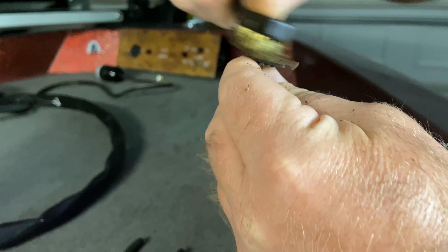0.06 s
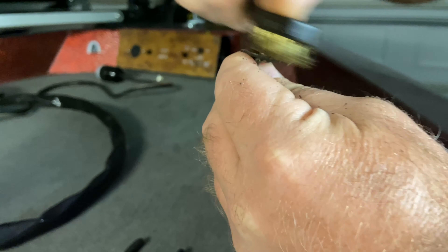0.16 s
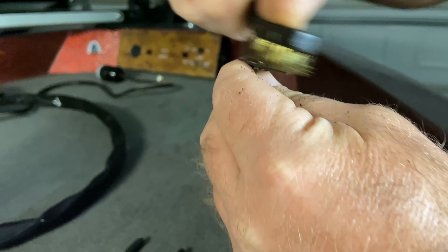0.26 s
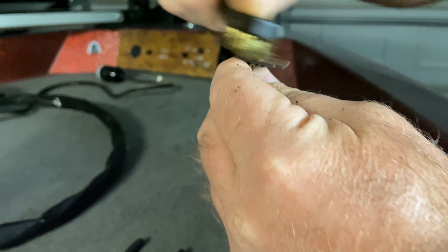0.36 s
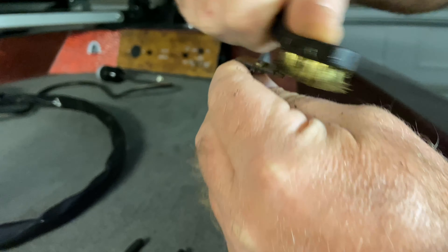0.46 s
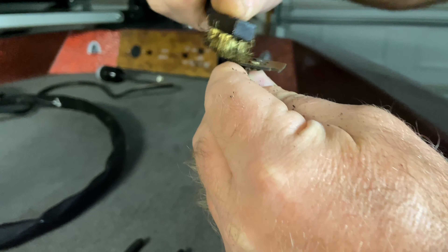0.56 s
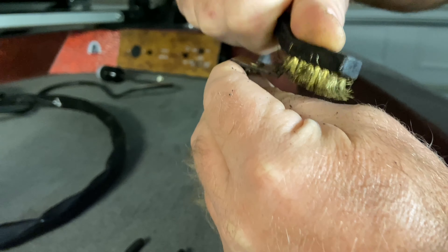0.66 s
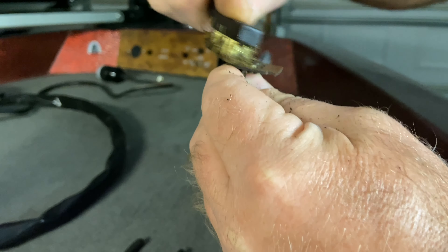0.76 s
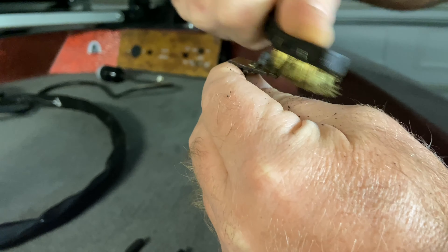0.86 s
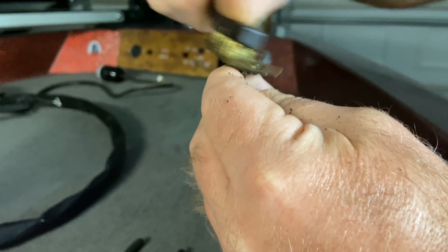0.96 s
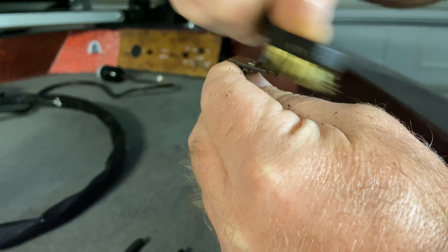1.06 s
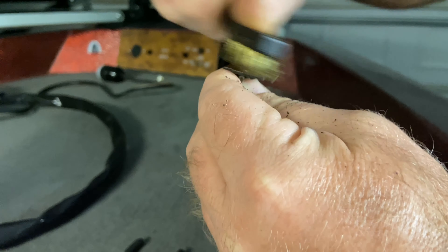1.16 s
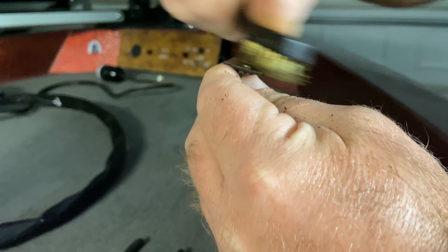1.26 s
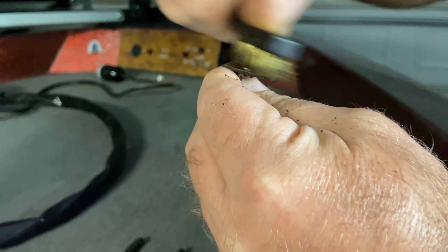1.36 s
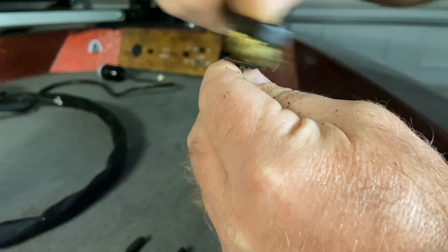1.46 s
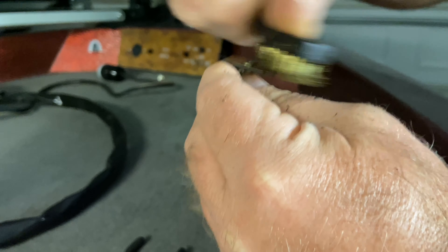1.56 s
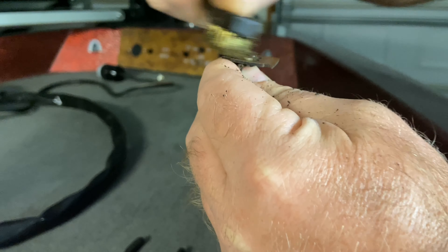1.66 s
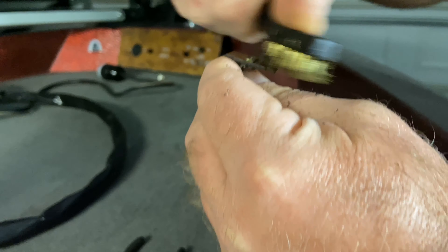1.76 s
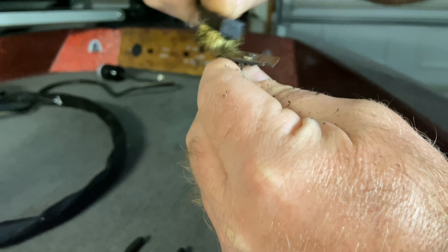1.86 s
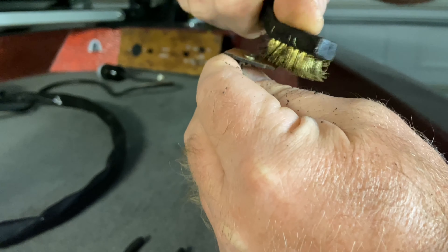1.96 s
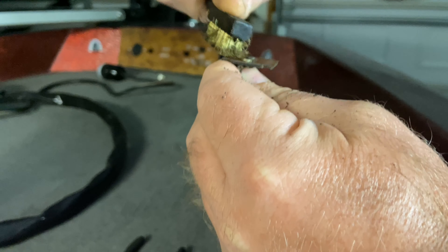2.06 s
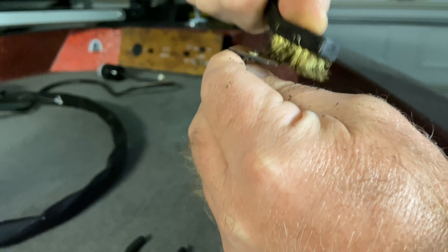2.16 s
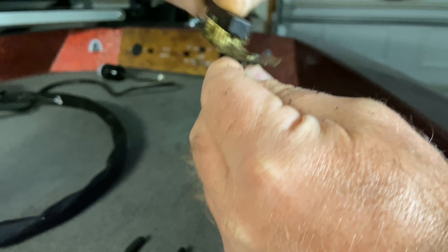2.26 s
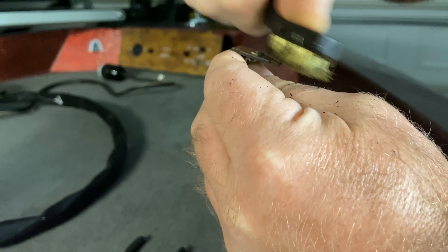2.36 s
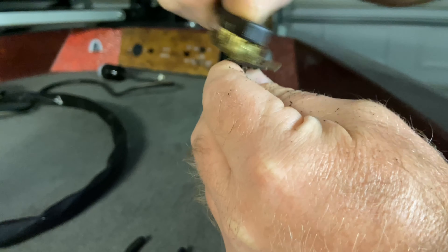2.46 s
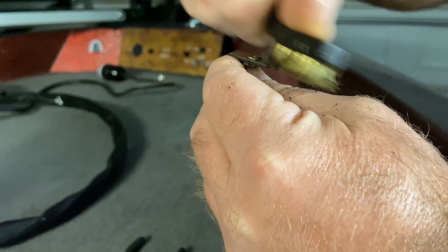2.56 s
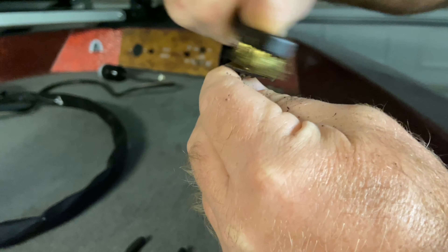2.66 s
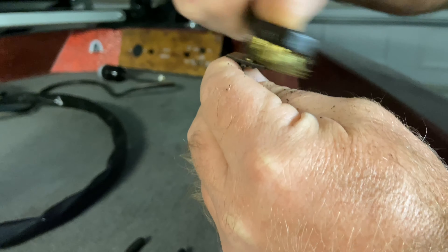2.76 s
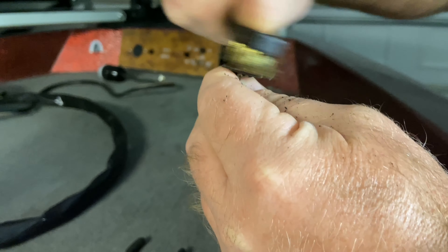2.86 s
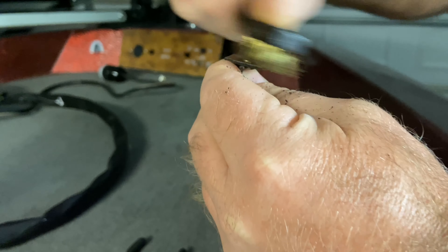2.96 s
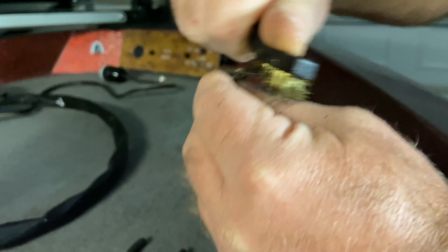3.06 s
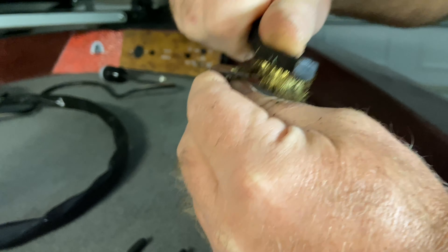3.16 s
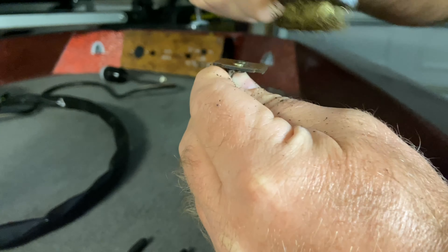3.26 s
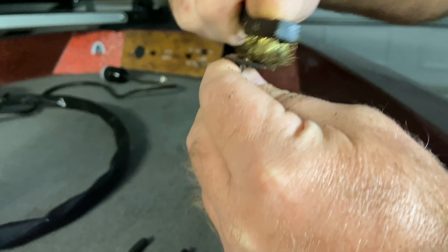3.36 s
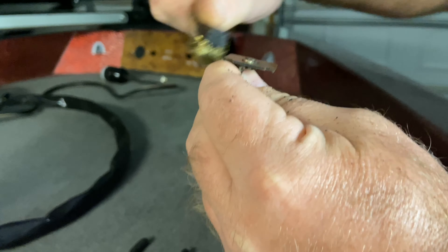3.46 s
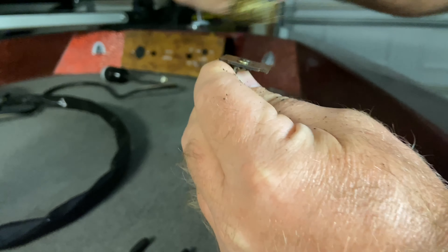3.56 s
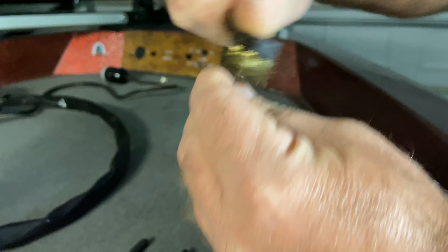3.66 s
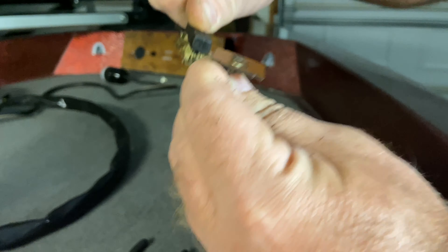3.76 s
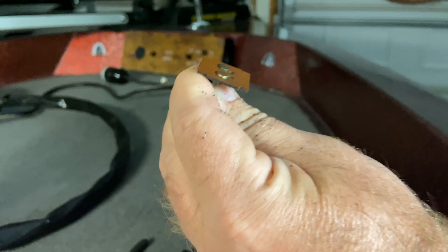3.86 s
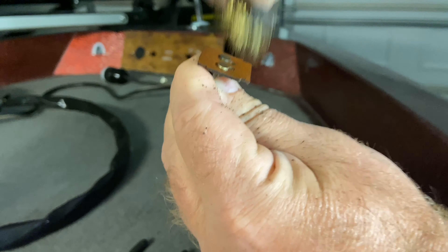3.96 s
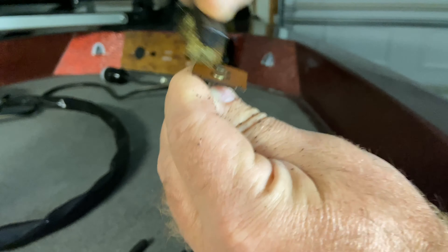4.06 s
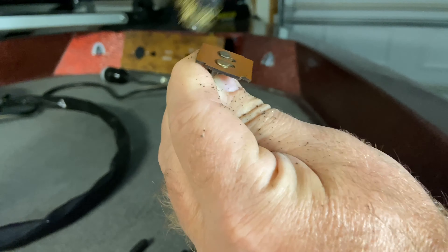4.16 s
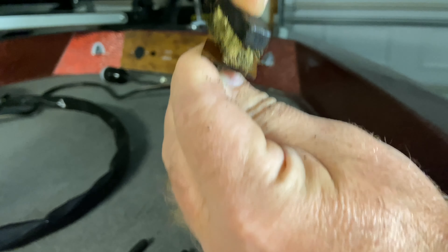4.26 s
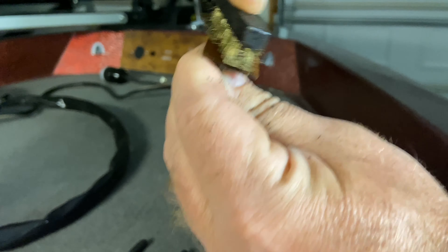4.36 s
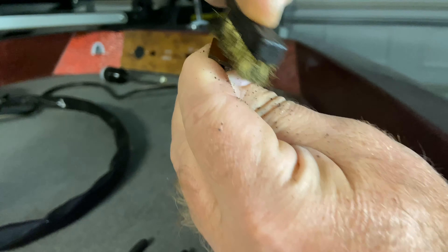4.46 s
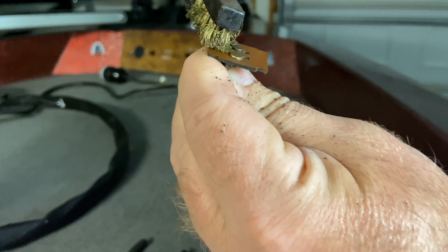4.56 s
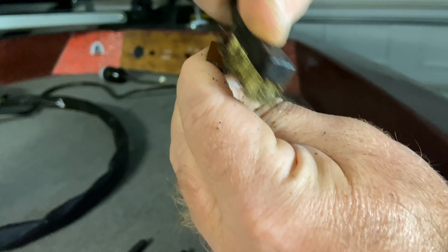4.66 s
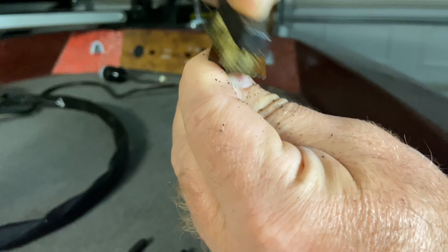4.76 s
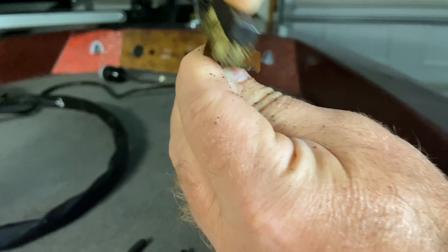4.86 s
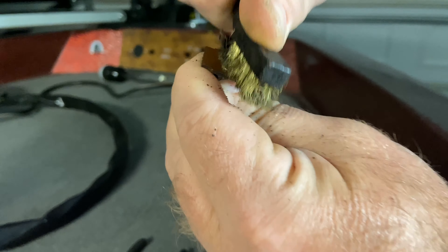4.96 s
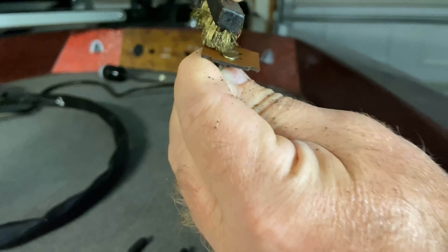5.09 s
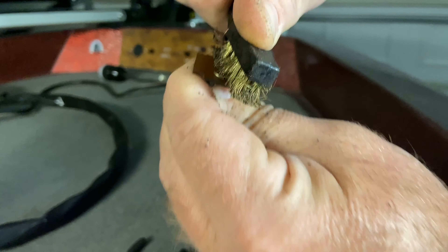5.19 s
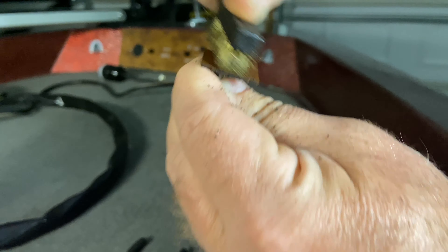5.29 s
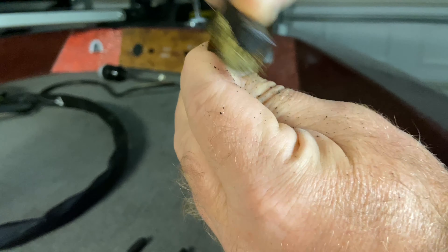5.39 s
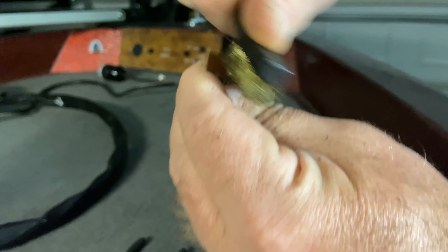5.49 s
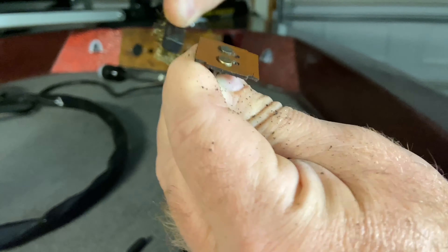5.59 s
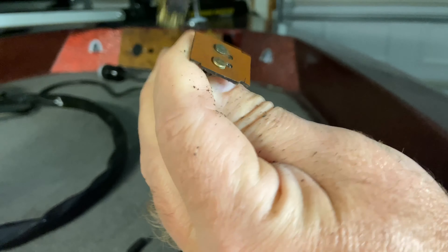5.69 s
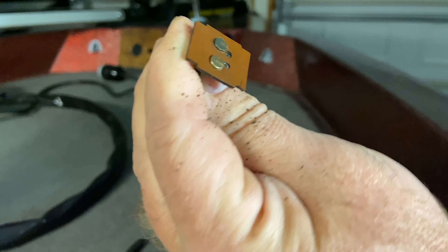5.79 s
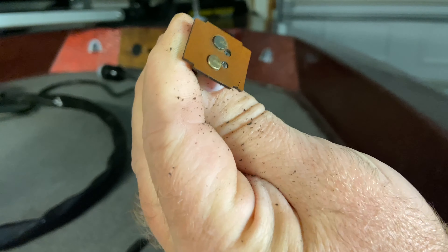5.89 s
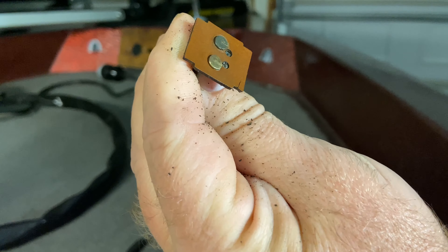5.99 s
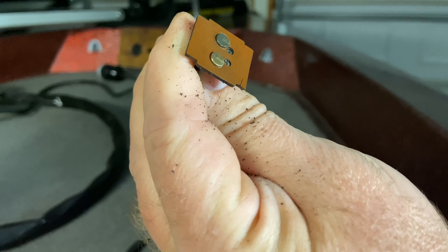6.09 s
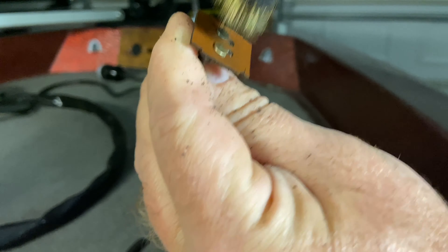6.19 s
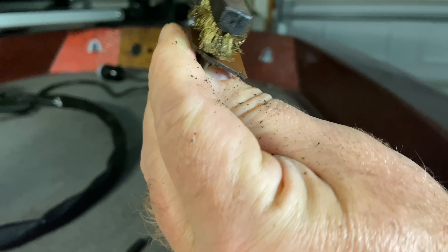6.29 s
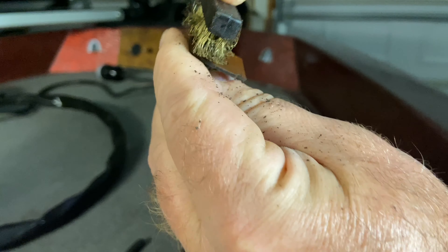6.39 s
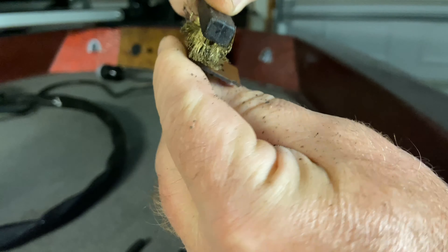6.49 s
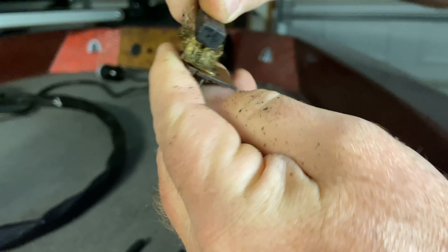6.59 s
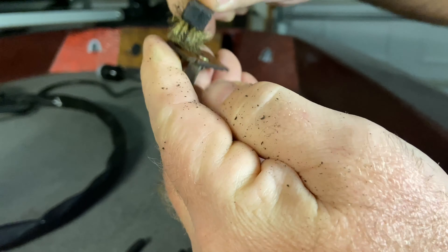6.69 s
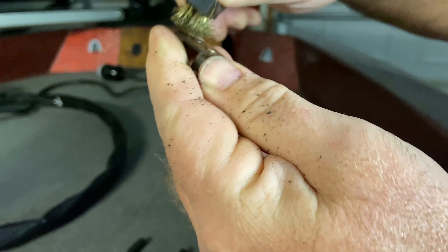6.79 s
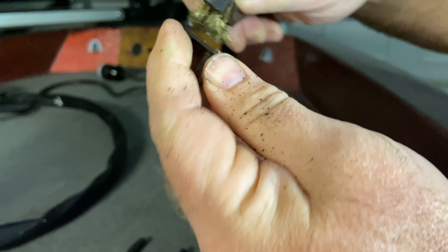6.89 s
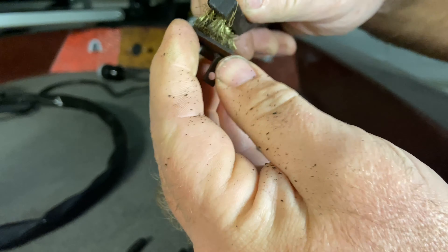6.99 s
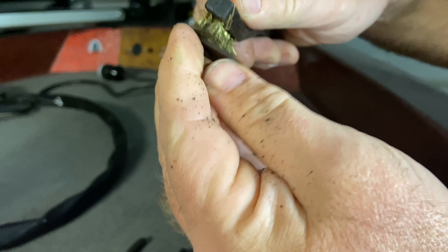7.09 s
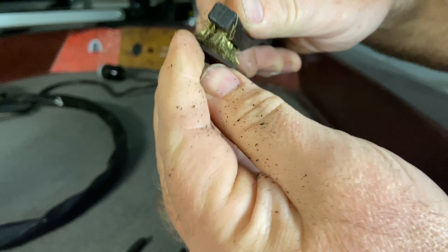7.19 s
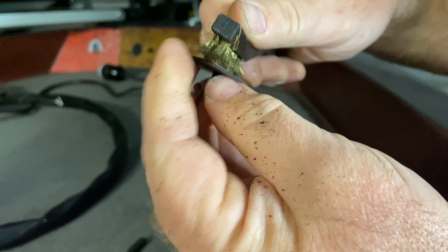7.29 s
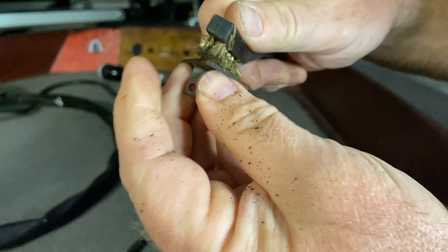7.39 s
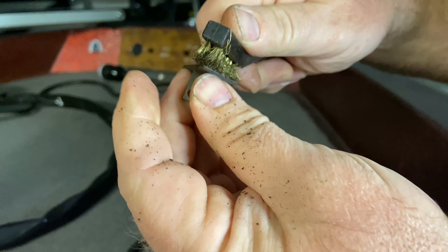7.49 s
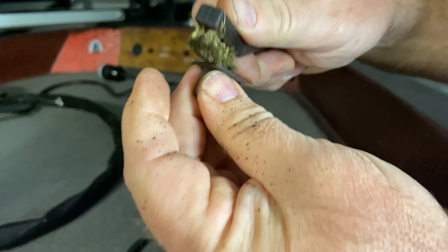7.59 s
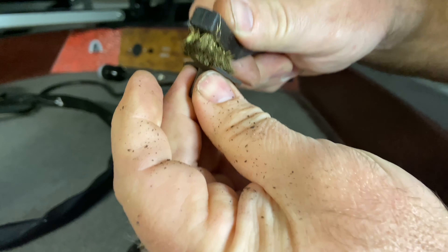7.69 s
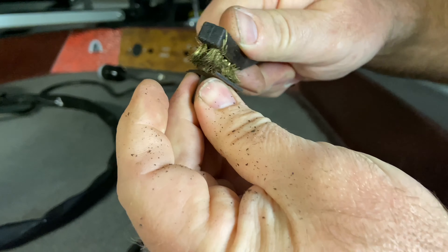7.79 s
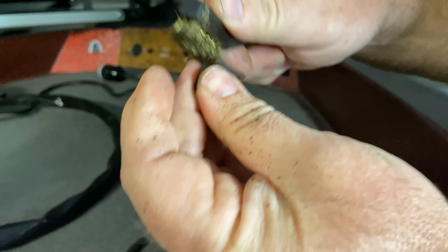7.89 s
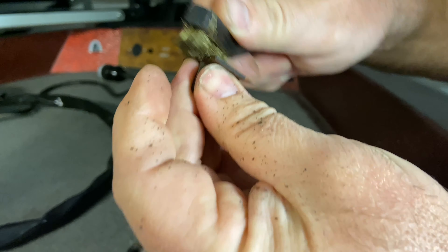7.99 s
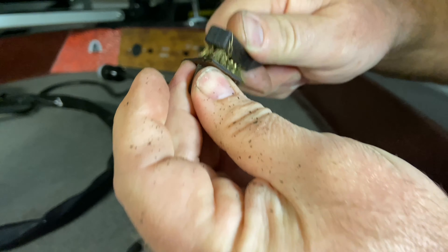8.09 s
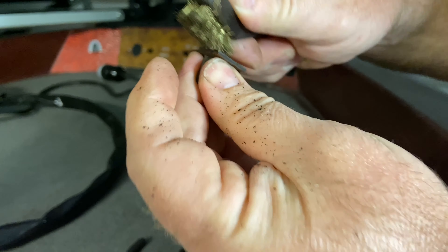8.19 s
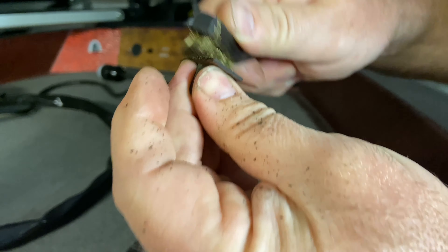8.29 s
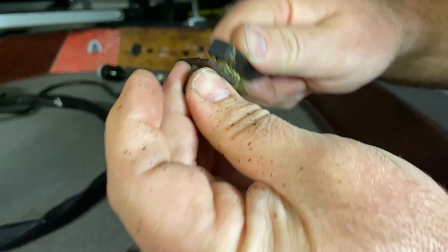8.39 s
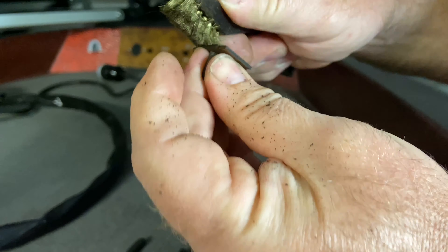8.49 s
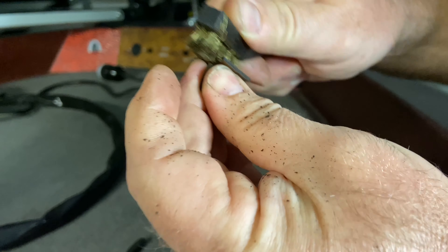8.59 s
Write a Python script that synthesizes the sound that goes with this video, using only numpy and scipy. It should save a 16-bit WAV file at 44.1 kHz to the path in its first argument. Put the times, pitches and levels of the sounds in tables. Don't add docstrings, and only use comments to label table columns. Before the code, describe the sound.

Close up, a small brass-bristled brush scours contacts on a hand-held board with fast, bright, raspy strokes. It breaks into separate flicks and knocks, scrubs again at longer strokes, drops to faint rubs and wire ticks, then finishes with slower edge scrubbing. Low bench shudders and a quiet workshop hush lie beneath.

```python
import sys
import numpy as np
from scipy import signal
from scipy.fft import rfft, irfft
from scipy.io import wavfile
from scipy.ndimage import uniform_filter1d

SR = 44100
rng = np.random.default_rng(int(sys.argv[2]) if len(sys.argv) > 2 else 0)


def field_ratio(decibels):
    return 10 ** (np.asarray(decibels, dtype=float) / 20)


def inscribe(sig):
    pcm = np.round(np.clip(np.atleast_2d(sig).T, -1, 1) * 32767)
    wavfile.write(sys.argv[1], SR, pcm.astype(np.int16))


N = 381288
TIME = np.arange(N) / SR

# (turn time [s], level [dB], dip at the turn [dB])
QUICK_STROKES = [(-.045, -48, -12), (0.076, -46, -15.5), (0.183, -46.5, -18), (0.305, -45, -19),
                 (0.415, -43.5, -12), (0.533, -45.5, -16.5), (.637, -46, -14), (0.752, -45, -15.5),
                 (0.854, -45, -17), (0.963, -43, -20), (1.07, -44.5, -17), (1.182, -44, -21.5),
                 (1.282, -44.5, -24), (1.397, -42.5, -25), (1.498, -44.5, -20), (1.614, -44, -14),
                 (1.719, -44.5, -19.5), (1.828, -42.5, -16), (1.931, -48, -17.5), (2.046, -42, -19),
                 (2.14, -45, -24.5), (2.253, -45, -13), (2.356, -45, -16.5), (2.457, -46, -16),
                 (2.561, -46.5, -9), (2.68, -45.5, -16.5), (2.777, -42.5, -16.5), (2.886, -44.5, -17),
                 (2.981, -50.5, -0.5), (3.057, -49, -15.5)]
# (turn time [s], level [dB], dip at the turn [dB])
LONG_STROKES = [(4.302, -49, -20), (4.408, -48, -17), (4.533, -45, -23.5), (4.656, -47, -14),
                (4.79, -46, -21), (4.926, -43.5, -22), (5.059, -44, -22.5), (5.175, -46.5, -24),
                (5.318, -45, -8), (5.43, -38.5, -23), (5.545, -70, -22.5)]
# (turn time [s], level [dB], dip at the turn [dB])
EDGE_STROKES = [
    (7.485, -51.5, -13),
    (7.615, -53.5, -11),
    (7.73, -64.5, -25),
    (7.817, -49, -15.5),
    (7.913, -45.5, -19.5),
    (8.051, -43, -22),
    (8.178, -45, -14),
    (8.339, -44.5, -13.5),
    (8.479, -50, -8.5),
    (8.627, -68, -19),
]
STROKES = [QUICK_STROKES, LONG_STROKES, EDGE_STROKES]
# (speeding-up share of stroke [0-1], slowing share [0-1], board against bristles [dB],
# mount low modes [dB], mount upper modes [dB])
BOUTS = [
    (0.35, 0.26, -18.5, -63.5, -63),
    (0.34, 0.24, -14, -63.5, -71),
    (0.39, 0.22, -10, -80, -77.5),
]
TRAIL_DB_PER_S = 135
# (frequency [Hz], right port lead [half turns])
PORT_TURN = [(0, 0), (400, .1), (1000, .8), (1600, 1.2), (2600, 1.2), (3500, 1), (5900, .87), (6500, .1),
             (7200, .25), (9080, 1), (11100, 2), (13300, 3), (15500, 4), (17700, 5)]


def brush():
    # (frequency [Hz], width [Hz], level [dB])
    board_modes = [(575, 390, -10), (1280, 1300, -23.5), (1836, 89, -1.5), (1982, 66, 3), (2144, 80, 5),
                   (2358, 130, 8.5), (2576, 160, 7.5), (2982, 300, 7), (3542, 630, 4)]
    # (time [s], frequency [Hz], lift [dB])
    grip = [
        (0, 2290, -2),
        (7.4, 2370, 1.5),
        (7.52, 2950, 8.5),
        (7.7, 2910, 8),
        (7.82, 2430, 2.5),
        (8.645, 2530, 11),
    ]
    level_db, board_db, tuft_hz = effort()
    light = np.clip((-60.5 - level_db) / 10, 0, 1)
    clump_db = (1 + 0.45 * light) * (1.3 * wander(180) + 1.2 * wander(40))
    clicks = slips(16000, 2.1, clump_db)
    wires = evened(ticks(clicks, 4.5, 2.4, tuft_hz, 12 * light))

    push = slips(7000, 2.8, 0.3 * clump_db)
    s, grip_hz, lift_db = np.transpose(grip)
    grip_hz, lift_db = np.interp(TIME, s, grip_hz), np.interp(TIME, s, lift_db)
    board = 0
    for hz, width_hz, db in board_modes:
        free = 1 / (1 + ((hz - grip_hz) / 250) ** 2)
        share = free - 0.49 if hz > 1500 else 0.25
        ring = modes(modes(push, [(hz, 3 * width_hz, 0)]), [(hz, width_hz, db)])
        board = board + field_ratio(drift_db(2.5, 14) + lift_db * share) * ring
    return field_ratio(level_db + 0.5) * wires + field_ratio(level_db + board_db + 0.88) * evened(board)


def effort():
    # (time [s], length [s], landing level [dB], lift-off level [dB],
    # board against bristles [dB])
    flicks = [
        (3.13, 0.03, -58.5, -54, -34),
        (3.3065, 0.11, -57, -45, -15),
        (3.591, 0.082, -47.5, -41.5, -13.5),
        (3.946, 0.1, -47.5, -42.5, -16),
        (4.213, 0.0016, -59, -44.5, -20),
        (5.665, 0.0089, -53, -52, -10),
        (6.179, 0.015, -60, -50.5, -20),
        (6.634, 0.007, -64, -64, -30),
    ]
    # (time [s], length [s], level [dB],
    # board against bristles [dB], tuft pitch [Hz])
    rubs = [(3.86, 0.074, -77, -18, 9000), (4.04, 0.0096, -56.5, -18, 7800),
            (4.239, 0.055, -58.5, -13, 8800), (5.561, 0.15, -65.5, -10.5, 6200),
            (5.7, 0.017, -73.5, 7, 7900), (6.26, .17, -63, -14, 9000), (6.46, .05, -67.5, -22, 9000),
            (6.549, 0.068, -57, -36, 6040), (6.634, 0.041, -62, -8, 8500), (6.748, 0.016, -61, -19, 10500),
            (6.828, .05, -70.5, -13, 10000), (6.902, 0.08, -64, -32, 4900), (7.028, 0.0092, -68, -32, 7420),
            (7.106, 0.04, -70, -34, 7600), (7.192, 0.065, -62.5, -51, 11200), (7.295, 0.1, -66, -20, 8520),
            (7.395, .05, -74, -18, 10000), (8.64, .01, -64.5, -15, 8850)]
    rest_db, open_tuft_hz = -103, 9000
    turn_board_db, trail_board_db = 3, 1
    settle, bite, bite_db = 0.29, 0.47, -4.5
    lift_s, lift_off_db = 0.012, -17.5
    touches = []
    for strokes, (rise, fall, board_db, *_) in zip(STROKES, BOUTS):
        db, turning = bout(strokes, rise, fall)
        touches.append((db, board_db + turn_board_db * turning, open_tuft_hz))

    for s, length, land_db, lift_db, board_db in flicks:
        end = s + length
        times = [s, s + settle * length, s + bite * length, end, end + lift_s]
        levels = [land_db, land_db, max(land_db, lift_db + bite_db), lift_db, lift_db + lift_off_db]
        db = np.interp(TIME, times, levels) + hump(s, length + lift_s, 0, 0, TRAIL_DB_PER_S)
        free = TIME > end + lift_s / 2
        touches.append((np.where(TIME < s, rest_db, db), board_db + trail_board_db * free, open_tuft_hz))

    for s, length, db, board_db, hz in rubs:
        landed = TIME > max([0] + [row[0] for row in flicks if row[0] < s])
        touches.append((np.where(landed, hump(s, length, db, 259, 257), rest_db), board_db, hz))

    level, board, tuft = np.full(N, float(rest_db)), np.zeros(N), np.full(N, float(open_tuft_hz))
    for db, board_db, hz in touches:
        wins = db > level
        level = np.where(wins, db, level)
        board = np.where(wins, board_db, board)
        tuft = np.where(wins, hz, tuft)
    return level, uniform_filter1d(board, size=200), tuft


def bout(strokes, rise, fall):
    s, db, dip_db = np.transpose(strokes)
    span = np.diff(s)
    times = np.transpose([s[:-1], s[:-1] + rise * span, s[1:] - fall * span])
    levels = np.transpose([db[:-1] + dip_db[:-1], db[:-1], db[:-1]])
    top = np.interp(TIME, s[:-1] + span / 2, db[:-1])
    level = np.interp(TIME, [*times.flat, s[-1]], [*levels.flat, db[-1] + dip_db[-1]])
    turning = np.clip((top - level) / 16, 0, 1)
    return level + hump(s[0], s[-1] - s[0], 0, 2000, TRAIL_DB_PER_S), turning


def slips(per_s, spread_db, clump_db):
    size = field_ratio(spread_db * np.minimum(rng.exponential(1, N), 5)) * rng.choice([-1., 1.], N)
    return size * (rng.random(N) < per_s / SR) * field_ratio(clump_db)


def ticks(clicks, cycles, patch_db, tuft_hz, focus_db):
    # (frequency [Hz], level [dB])
    bristle = [(1500, -23), (3500, -25.5), (5000, -3), (6200, -6.5), (8000, -0.5), (12000, 1.5), (15300, 3),
               (16500, -4.5)]
    # (time [s], tilt [dB per octave])
    tilt = [
        (0, 1),
        (3.1, 0),
        (3.4, 1.5),
        (5.6, 2.5),
        (6.2, -0.5),
        (7.4, -4),
        (7.5, 3),
        (7.9, -0.5),
        (8.65, 2),
    ]
    count = 18
    wire, out = rng.integers(0, count, N), np.zeros(N)
    tilt_db = np.interp(TIME, *np.transpose(tilt))
    for k, hz in enumerate(np.linspace(2500, 16500, count)):
        at = np.flatnonzero((wire == k) & (clicks != 0))
        near = 1 / (1 + ((hz - tuft_hz[at]) / 1200) ** 2)
        touch_db = drift_db(patch_db, 14, TIME[at]) + focus_db[at] * (near - 1.07)
        touch_db += tilt_db[at] * np.log2(hz / 10000)
        touch = np.zeros(N)
        touch[at] = clicks[at] * field_ratio(touch_db)
        r, turn = np.exp(-hz / cycles / SR), 2 * np.pi * hz / SR
        strike = [np.sin(turn) * np.sqrt(1 - r ** 2)]
        ring = signal.lfilter(strike, [1, -2 * r * np.cos(turn), r ** 2], touch)
        out += field_ratio(read(bristle, hz)) * ring
    return out


def snags():
    # (time [s], peak [dB], length [s], pitch [Hz])
    catches = [(0.052, -51, .001, 12100), (0.155, -35, 0.00087, 13000), (0.226, -58, 0.0012, 10000),
               (0.373, -44, .001, 12000), (0.797, -40.5, 0.00086, 14900), (0.872, -44, 0.0014, 12000),
               (.35, -42, .002, 11000), (0.93, -48, 0.0013, 12500), (1.328, -40, .001, 15000),
               (1.4316, -53, .001, 10000), (1.5504, -40.5, .001, 12000), (1.7694, -36, 0.00061, 14500),
               (1.225, -42, 0.0018, 11100), (1.658, -36, 0.0016, 11000), (2.0915, -36, .003, 8300),
               (2.1095, -48, 0.00091, 12000), (2.2964, -41.5, .0015, 11500), (2.3076, -38, 0.0011, 15000),
               (2.3976, -35, 0.0014, 15000), (2.747, -40.5, .001, 12000), (2.9395, -39, 0.0011, 15000),
               (2.959, -50, 0.00051, 12000), (2.821, -43, 0.0023, 11000), (3.015, -43, 0.0032, 12300),
               (3.4182, -35, 0.0039, 12200), (3.668, -54, 0.0031, 14500), (3.6706, -29.5, 0.0024, 14000),
               (4.015, -46, 0.00088, 12500), (4.0372, -46, 0.001, 14000), (4.0422, -30, 0.00078, 8100),
               (4.0468, -29, 0.00082, 14000), (4.3784, -41.5, 0.0037, 11500), (4.618, -34.5, 0.0028, 11400),
               (4.942, -39.5, .001, 12400), (4.969, -44.5, .0015, 12200), (5, -39, .001, 13000),
               (5.127, -31.5, 0.00087, 14000), (5.222, -49, 0.00092, 12000), (5.277, -35, 0.0018, 11500),
               (5.342, -40.5, 0.0013, 12500), (5.452, -44.5, 0.0021, 11000), (5.515, -28.5, 0.0026, 14500),
               (7.545, -39, .0014, 13400), (7.635, -47, 0.0049, 9000), (7.959, -47, 0.0018, 9500),
               (8.103, -36, 0.0054, 11000), (8.245, -45, .001, 11500), (8.407, -36, 0.0022, 11000),
               (8.5295, -37.5, 0.00042, 10500), (8.583, -41, 0.00068, 13300), (8.593, -39, .0008, 12000)]
    # (time [s], peak [dB], thud re peak [dB], clack re peak [dB], length [s])
    landings = [
        (3.3078, -52, -18, -10, 0.0017),
        (3.5926, -38, -19, -13, 0.002),
        (3.9333, -58, -24, -8, .0006),
        (3.9476, -32, -19, -14, 0.0005),
        (4.2154, -36, -21, -20, 0.0012),
        (5.6676, -48, -21, -26, 0.003),
        (6.6231, -31, -33, -9, 0.0004),
    ]
    # (time [s], peak [dB], pitch [Hz])
    plucks = [(0.4261, -52, 8700), (0.653, -45, 8800), (1.1664, -49, 11600), (1.275, -48, 10400),
              (1.2938, -47, 8200), (1.503, -50, 7960), (1.918, -41, 9200), (1.9513, -47, 8600),
              (2.2485, -57, 11700), (2.6908, -48.5, 10500), (2.9977, -56, 12100), (3.0343, -56, 12800),
              (3.095, -59, 9000), (3.1157, -55, 11400), (3.1257, -43.5, 9000), (3.766, -58.5, 3560),
              (3.954, -43, 6240), (4.2152, -37.5, 5600), (4.2216, -40.5, 6100), (4.2327, -44, 11000),
              (4.2717, -40, 15000), (4.3328, -42, 12100), (4.6688, -48, 10400), (4.8127, -42, 11900),
              (4.918, -42, 9400), (5.563, -50.5, 6800), (5.652, -64, 5900), (5.709, -55, 8600),
              (6.177, -48, 11800), (6.186, -46, 10900), (6.2127, -52, 9800), (6.2554, -64, 13900),
              (6.2722, -49, 11300), (6.2909, -57, 12100), (6.3102, -59, 11100), (6.446, -60, 9000),
              (6.549, -45, 13400), (6.5961, -60, 12000), (6.616, -55, 7800), (6.742, -61, 14100),
              (6.819, -61, 12900), (7.0346, -55, 9100), (7.112, -62, 10600), (7.1312, -63, 8300),
              (7.2262, -53, 12300), (7.246, -64, 12500), (7.257, -58, 10000), (7.2993, -56.5, 9600),
              (7.3433, -58, 10200), (7.363, -50, 7900), (7.3783, -47.5, 11800), (7.4416, -59, 11100),
              (7.456, -55.5, 7400), (7.4763, -58, 10500), (7.484, -43, 10200), (7.491, -60, 10900),
              (7.509, -42.5, 14300), (7.52, -43, 13400), (7.808, -51, 9400), (8.351, -55, 9700)]
    # (frequency [Hz], width [Hz], level [dB])
    thud_modes = [(463, 1400, 0.95), (1027, 1370, 0.34)]
    # (frequency [Hz], width [Hz], level [dB])
    clack_modes = [(2880, 1900, 0.0062)]
    swell_s, swell_db = 0.0044, -13
    rows = [(*row, 11000, 0) for row in landings]
    rows += [(s, db, -42.5, -38.5, length, hz, field_ratio(swell_db)) for s, db, length, hz in catches]
    rows += [(s, db - 1.5, -45, -45, 0.0007, hz, 0) for s, db, hz in plucks]

    bursts, t = np.zeros((3, N + 3000)), np.arange(-1000, 2000) / SR
    after, before = np.maximum(t, 0), np.minimum(t, 0)
    first_wire = 3 * (np.arange(len(t)) == 1004)
    high = signal.butter(2, 2600, "high", fs=SR)
    noise = rng.standard_normal((len(rows), len(t)))
    for (s, db, thud_db, clack_db, length, hz, swell), slip in zip(rows, noise):
        start = swell * np.exp(before / swell_s) + (1 - swell) * (1 - np.exp(-after / 0.000067))
        shape = start * np.exp(-after / max(length, 3e-4))
        knock = shape * (slip + first_wire)
        wires = signal.lfilter(*high, modes(knock, [(hz, 0.91 * hz, 0)]))
        wires /= np.sqrt(uniform_filter1d(wires ** 2, size=40).max())
        knock *= np.linalg.norm(shape) / np.linalg.norm(knock)
        gains = field_ratio([[db], [db + thud_db + 31], [db + clack_db + 23]])
        part = bursts[:, round(s * SR):][:, :len(t)]
        part += (gains * [wires, knock, knock])[:, :part.shape[1]]
    wires, thud, clack = bursts[:, 1000:N + 1000] + 1e-12
    thud = modes(modes(thud, thud_modes), thud_modes)
    clack = modes(modes(clack, clack_modes), clack_modes)
    return wires + thud + clack


def mount():
    # (frequency [Hz], width [Hz], level [dB])
    mount_modes = [
        [(47.3, 12.1, 2), (71.5, 41, 0.5)],
        [(97, 84, -3), (148, 51, 5), (286.4, 117, -4.5)],
    ]
    # (time [s], low modes [dB], upper modes [dB])
    pushes = [(.5, -58.5, -54), (.7, -56.5, -57), (1.149, -54.5, -58.5), (1.5, -69, -76), (1.63, -57, -58),
              (1.899, -46.5, -57), (2.218, -58.5, -59.5), (2.67, -55, -65), (3.09, -57.5, -63.5),
              (3.4, -52, -68), (3.5, -56, -60.5), (3.68, -55.5, -53.5), (3.77, -53, -74),
              (4.1, -59.5, -57.5), (4.65, -59, -58.5), (4.77, -58, -83), (5.06, -50.5, -55),
              (5.34, -54.5, -75), (5.52, -50, -49), (5.57, -53.5, -70), (7.5, -63.5, -69.5),
              (8.02, -57.5, -62), (8.28, -56.5, -56.5), (8.45, -59, -61), (8.6, -59, -71)]
    # (time [s], hold [s], low modes [dB], upper modes [dB])
    bumps = [
        (3.305, 0.04, -60.5, -60.5),
        (3.604, 0.036, -53.5, -54),
        (3.96, 0.091, -50, -59.5),
        (4.224, 0.059, -50, -58.5),
        (5.674, 0.017, -50, -54.5),
    ]
    push_in_db_per_s, bump_in_db_per_s, out_db_per_s = 156.5, 6300, 200
    shakes = []
    for strokes, (*_, low_db, upper_db) in zip(STROKES, BOUTS):
        s, end = strokes[0][0], strokes[-1][0]
        shakes.append((s, end - s, low_db, upper_db, push_in_db_per_s))
    shakes += [(s, 0, low_db, upper_db, push_in_db_per_s) for s, low_db, upper_db in pushes]
    shakes += [(*row, bump_in_db_per_s) for row in bumps]
    levels = np.ones((2, N)) * [[-77.5], [-82]]
    for s, hold, low_db, upper_db, in_db_per_s in shakes:
        peak_db = np.array([[low_db], [upper_db]])
        levels = np.maximum(levels, hump(s, hold, peak_db, in_db_per_s, out_db_per_s))

    common, own = slips(200, 2.73, 0), slips(200, 2.7, 0)
    jolts = np.array([common + 0.3 * own, common - 0.3 * own])
    low, upper = [evened(modes(modes(jolts, table), table)) for table in mount_modes]
    return field_ratio([[2.5], [-2.5]]) * (field_ratio(levels[0]) * low + field_ratio(levels[1] - 3) * upper)


def ports(x, direct=0):
    # (frequency [Hz], likeness [0-1])
    port_same = [(300, .3), (1200, .22), (2100, .36), (3000, .3), (3800, .52), (4700, .3), (5900, .55),
                 (6300, .35), (7000, .68), (9000, .76), (11000, .88), (13000, .92), (16000, .88)]
    # (frequency [Hz], left minus right [dB])
    port_lean = [(60, 2), (180, 4), (550, 4), (1650, 4), (4970, 1.3), (15000, .3)]
    # (time [s], path re rest [ratio], extra lead near 4.8 kHz [half turns])
    port_sway = [
        (0, 1.004, 0),
        (3, 1.004, 0),
        (3.3, 1.003, -.3),
        (6, .996, -.3),
        (7.4, .996, .15),
        (9, .996, .15),
    ]
    hz, t, left = signal.stft(x, SR, nperseg=128, noverlap=64)
    rows_hz = hz[:, None]
    s, length, shade = np.transpose(port_sway)
    path = np.interp(t, s, length) + drift_db(0.012, 12, t)
    shade = np.interp(t, s, shade) + drift_db(0.12, 15, t)
    shade = shade * np.exp(-((rows_hz - 4800) / 1500) ** 2)
    turn = np.exp(1j * np.pi * (shade + np.interp(rows_hz * path, *np.transpose(PORT_TURN))))
    scattered = field_ratio(4) * np.exp(2j * np.pi * rng.random(left.T.shape).T)
    same = np.clip(read(port_same, hz), direct * np.where(hz > 6500, 1, 0.5), 1)[:, None]
    right = left * (same * turn + np.sqrt(1 - same ** 2) * scattered)
    lean = field_ratio(read(port_lean, hz) / 2)[:, None]
    return signal.istft(np.array([left * lean, right / lean]), SR, nperseg=128, noverlap=64)[1][:, :N]


def room(x):
    # (frequency [Hz], t60 [s])
    decay = [(500, 0.2), (4000, 0.23), (16000, 0.055)]
    taps = np.zeros((2, SR // 2))
    start = np.arange(200, SR // 2 - 20, 20)
    at = start + rng.integers(0, 20, (2, len(start)))
    np.put_along_axis(taps, at, rng.choice([-1., 1.], at.shape), 1)
    hz, t, z = signal.stft(taps, SR, nperseg=256)
    tail = signal.istft(z * field_ratio(-60 * t / read(decay, hz)[:, None]), SR, nperseg=256)[1]
    return signal.oaconvolve(x[None], tail / np.linalg.norm(tail[0]), axes=1)[:, :N]


def air():
    # (frequency [Hz], density [dB per Hz])
    hush_spectrum = [(18, -47), (30, -31.5), (70, -8.5), (95, -12), (133, -27.5), (254, -23.5), (508, -32),
                     (548, -30.5), (656, -33.5), (1930, -41), (2090, -41.5), (2310, -42.5), (14000, -51.5)]
    hush_db, whine_db, whine_hz = -71.5, -96, 2010
    hz = np.fft.rfftfreq(N, 1 / SR)
    left, other = rfft(rng.standard_normal((2, N)))
    same = np.clip(1 / (1 + (hz / 260) ** 2) + 0.85 / (1 + (6500 / (hz + 1)) ** 6), 0, 1)
    turn = np.exp(1j * np.pi * np.interp(hz, *np.transpose(PORT_TURN)))
    pair = np.array([left, same * turn * left + np.sqrt(1 - same ** 2) * other])
    colour = field_ratio(read(hush_spectrum, hz) - 20 * (hz > 12400))
    hush = field_ratio(hush_db) * evened(irfft(pair * colour, N))
    return hush + field_ratio(whine_db + drift_db(1.5, 2.4)) * np.sin(2 * np.pi * whine_hz * TIME)


def evened(x):
    return x / np.sqrt(np.mean(x ** 2) + 1e-20)


def read(points, hz):
    f, value = np.transpose(points)
    return np.interp(np.log(hz + 1), np.log(f + 1), value)


def modes(x, table):
    out = 0
    for k, (hz, width_hz, db) in enumerate(table):
        out = out + (-1) ** k * field_ratio(db) * signal.lfilter(*signal.iirpeak(hz, hz / width_hz, SR), x)
    return out


def wander(per_s):
    return evened(signal.lfilter(*signal.butter(2, per_s, fs=SR), rng.standard_normal(N)))


def drift_db(depth_db, per_s, t=TIME):
    values = rng.standard_normal(200)
    return depth_db * np.interp(t * min(per_s, 20), np.arange(len(values)), values)


def hump(start, length, db, in_db_per_s, out_db_per_s):
    climb = in_db_per_s * np.maximum(start - TIME, 0)
    return db - climb - out_db_per_s * np.maximum(TIME - start - length, 0)


def scene():
    scrub, bursts = brush(), snags()
    pair = ports(scrub) + ports(field_ratio(1.5) * bursts, direct=0.92)
    return pair + mount() + room(field_ratio(-9.5) * scrub + field_ratio(-22) * bursts) + air()


def joint_stereo(x):
    under_db, masked_db, dip_db, keep_db, lead = 4.6, 13, 6.5, -60, 831
    pair = np.pad(np.array([x[0] + x[1], x[0] - x[1]]) / 2, ((0, 0), (lead, 0)))
    hz, t, z = signal.stft(pair, SR, "cosine", nperseg=2048)
    edges = np.r_[0, np.geomspace(116, 320, 18)[:-1].astype(int), 320:1025:32]
    width = np.diff([*edges, len(hz)])
    power = np.add.reduceat(abs(z) ** 2, edges, axis=1) / width[:, None]
    power_db = uniform_filter1d(10 * np.log10(power + 1e-20), size=2, axis=2)
    low = hz[edges][:, None]
    weaker_db, top_db = power_db[::-1] - power_db, power_db[:, 18:].max((0, 1))

    past, ahead = [np.maximum(np.roll(top_db, k), np.roll(top_db, 2 * k)) for k in (1, -1)]
    dip = np.minimum(past, ahead) - top_db > dip_db
    loud = top_db > np.percentile(top_db, 40)
    masked = (power_db < top_db - masked_db) & (weaker_db > 0.3) & loud
    busy = (top_db > np.percentile(top_db, 20)) | (low > 8000)
    fickle = (low > 7000) | (rng.random(weaker_db.T.shape).T > 0.12)
    dropped = fickle & ((weaker_db > under_db) | masked) & (low > 2700) & busy & ~dip

    fast = uniform_filter1d(np.diff(x[0], prepend=0) ** 2, size=64)
    jump = fast > 14 * np.roll(uniform_filter1d(fast, size=600), 340)
    sudden = np.interp(t - lead / SR, TIME, uniform_filter1d(jump * 1., size=1100)) > 1e-6
    sudden_db = -60 * (low > 16500) - 6 * (low > 15750)
    gain_db = np.where(sudden, sudden_db, keep_db * dropped - 60 * (low > 15750))
    z = z * np.repeat(field_ratio(gain_db), width, axis=1)
    mid, side = signal.istft(z, SR, "cosine", nperseg=2048)[1][:, lead:lead + N]
    return np.array([mid + side, mid - side])


def low_pass(x):
    return signal.sosfilt(signal.butter(12, 17000, fs=SR, output="sos"), x)


def record(dry):
    mix = joint_stereo(dry)
    return low_pass(mix)


dry = scene()
out = record(dry)
inscribe(out)
```